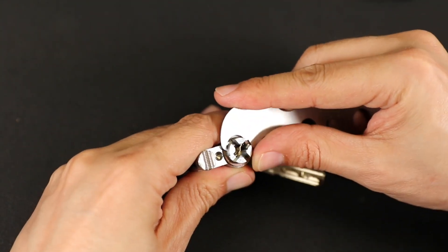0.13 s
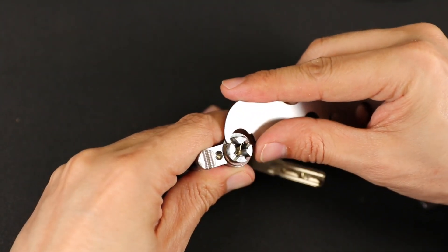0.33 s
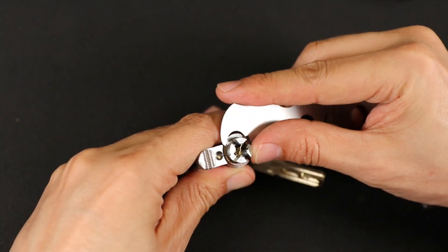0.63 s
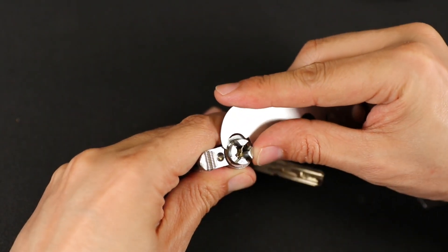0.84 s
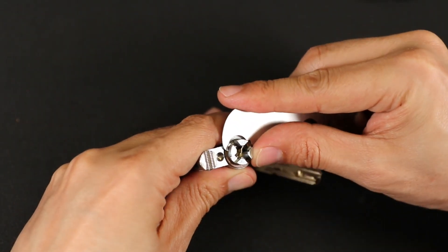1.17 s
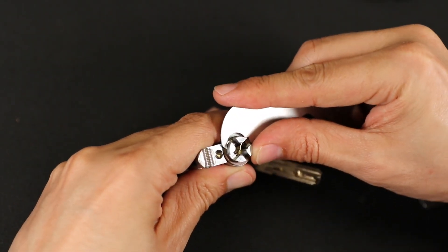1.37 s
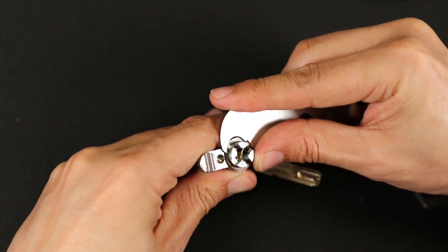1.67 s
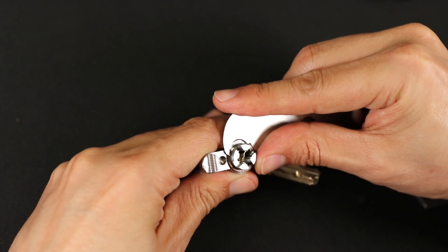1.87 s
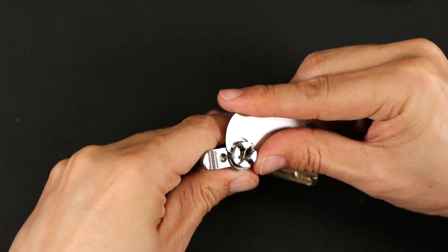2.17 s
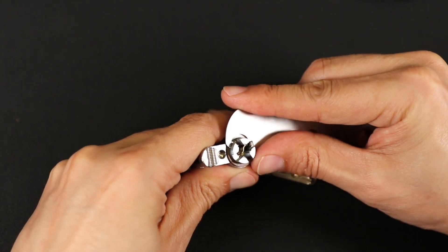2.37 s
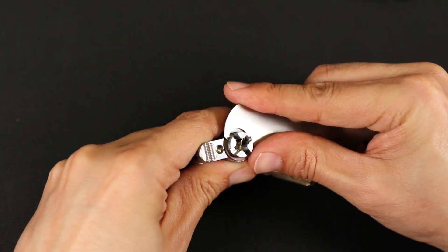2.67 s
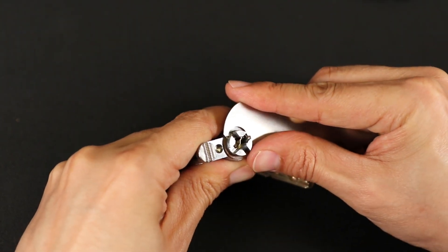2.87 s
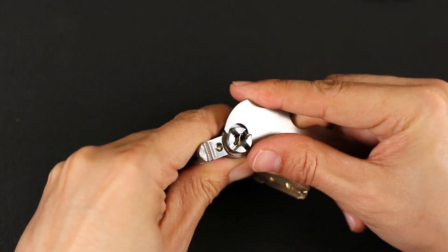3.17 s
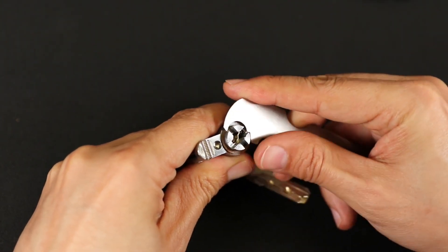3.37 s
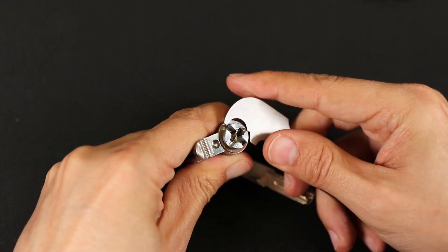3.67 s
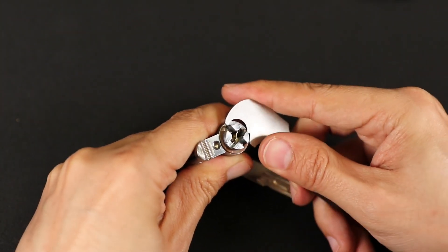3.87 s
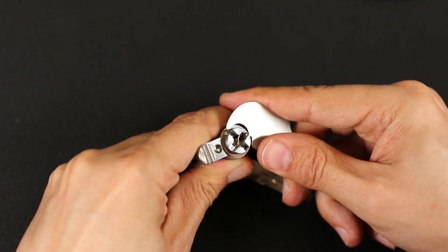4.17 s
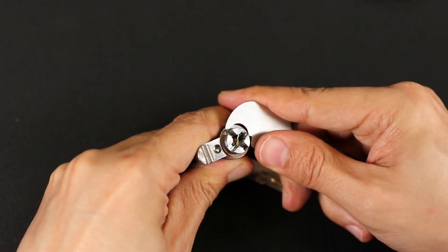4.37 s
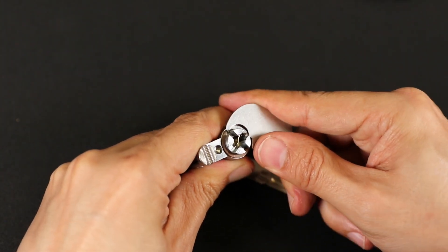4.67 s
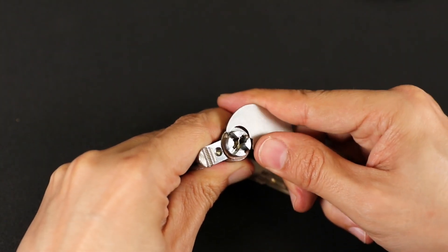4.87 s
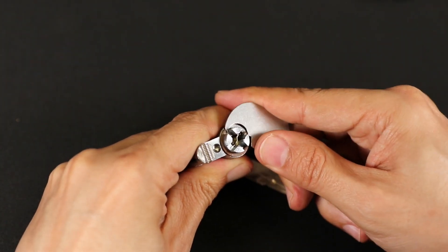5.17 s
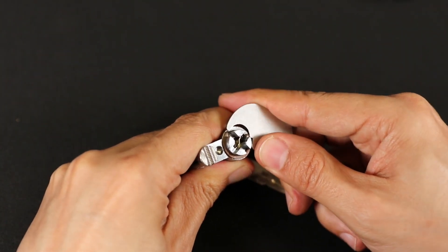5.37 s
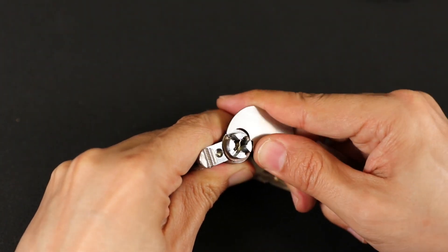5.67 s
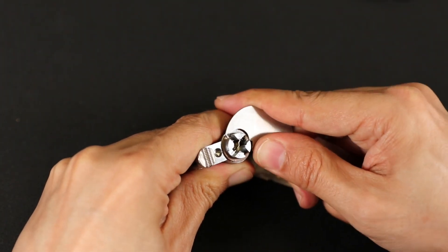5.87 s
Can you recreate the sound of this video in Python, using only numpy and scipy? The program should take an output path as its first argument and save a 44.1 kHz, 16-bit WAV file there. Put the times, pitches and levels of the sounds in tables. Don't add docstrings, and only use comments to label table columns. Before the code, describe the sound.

Close-up handling of a small brass lock: sharp ticks, hollow knocks, a brief key jingle and finger friction above quiet humming room noise.

```python
import sys
import numpy as np
from scipy import signal
from scipy.fft import rfft, irfft
from scipy.io import wavfile

SR = 44100
rng = np.random.default_rng(int(sys.argv[2]) if len(sys.argv) > 2 else 0)


def volts_from_db(level):
    exponent = np.asarray(level, float) / 20
    return 10 ** exponent


def unload_wav(signal):
    wavfile.write(
        sys.argv[1],
        SR,
        np.round(np.clip(np.atleast_2d(signal).T, -1, 1) * 32767).astype(np.int16),
    )


N = 265129
HISS_TOP_HZ = 15800


def unit(x):
    return x / np.sqrt(np.mean(x ** 2) + 1e-20)


def at_hz(points, hz):
    point_hz, point_db = np.array(points)[:, 0], np.array(points)[:, 1]
    return np.interp(np.log(hz), np.log(point_hz), point_db)


def resonance(x, hz, width_hz):
    r = np.exp(-np.pi * width_hz / SR)
    zeros = np.array([1, 0, -1]) * (1 - r * r) / 2
    poles = [1, -2 * r * np.cos(2 * np.pi * hz / SR), r * r]
    return signal.lfilter(zeros, poles, x)


def coloured(spectrum, top_hz=20000):
    hz = np.maximum(np.arange(N // 2 + 1) * SR / N, 5)
    white = rfft(rng.standard_normal(N))
    return unit(irfft(white * volts_from_db(at_hz(spectrum, hz)) * (hz < top_hz), N))


def struck(hz, gains, t60, t):
    sines = np.sin(2 * np.pi * np.outer(hz, t))
    return gains @ (sines * volts_from_db(-60 * np.outer(1 / t60, t)))


def add(track, s, sound):
    i = round(s * SR)
    track[i:i + len(sound)] += sound[:N - i]


def rumble():
    # (frequency [Hz], level [dB per Hz])
    room_spectrum = [(15, -13), (30, -22), (50, -8), (110, -3), (182, -5.5), (204, -13), (280, -9.5),
                     (340, -16.5), (424, -18.5), (728, -23), (972, -26), (1500, -31), (1950, -78)]
    return volts_from_db(-49) * coloured(room_spectrum)


def fan():
    # (frequency [Hz], width [Hz], rms level [dB])
    fan_modes = [(60, 3.1, -63), (95.6, 20.4, -56), (144.33, 4.8, -54), (178, 6.1, -60.5), (281, 34, -66),
                 (545, 5.6, -74), (1557, 54, -76.5)]
    hum_hz, hum_db = 177.6, -54
    out = volts_from_db(hum_db) * np.sqrt(2) * np.sin(2 * np.pi * hum_hz * np.arange(N) / SR)
    for hz, width_hz, level_db in fan_modes:
        air = rng.standard_normal(N + SR)
        ringing = resonance(resonance(air, hz, width_hz), hz, width_hz)
        out += volts_from_db(level_db) * unit(ringing[SR:])
    return out


def motor():
    run_starts = [-.31, .361, 1.151, 1.831, 2.501, 3.167, 3.844, 4.525, 5.195, 5.863, 6.5]
    gap_s, chirp_hz, chirp_db, chirp_s = 0.1185, 989, -60, 0.0073
    out, t = np.zeros(N), np.arange(N) / SR
    for start, following in zip(run_starts, run_starts[1:]):
        for s in np.arange(start, following - 0.06, gap_s):
            level, detune = rng.standard_normal(2)
            near = slice(max(0, round((s - 0.05) * SR)), max(0, round((s + 0.05) * SR)))
            bell = np.exp(-0.5 * ((t[near] - s) / chirp_s) ** 2)
            tone = np.sin(2 * np.pi * (chirp_hz + 12 * detune) * t[near])
            out[near] += volts_from_db(chirp_db + 2 * level) * bell * tone
    return out


def key():
    # (frequency [Hz], level [dB], t60 [s])
    key_modes = [(2816, -3, 0.033), (3780, -8, 0.037), (5460, -6.5, 0.029), (6770, -3, 0.03),
                 (7820, -4, 0.056), (9350, 2, 0.036), (10940, -4, .055), (12200, -6, .04),
                 (13000, -13, .055)]
    # (time [s], level [dB])
    jolts = [
        (3.4587, -46),
        (3.4851, -35.5),
        (3.6976, -30.5),
        (3.7637, -62),
        (5.2373, -57),
    ]
    out, t = np.zeros(N), np.arange(6000) / SR
    hz, mode_db, t60 = np.transpose(key_modes)
    for s, level_db in jolts:
        gains = volts_from_db(level_db + mode_db + 2 * rng.standard_normal(len(hz)))
        add(out, s, struck(hz, gains, t60, t))
    return out


def fingers():
    # (time [s], level [dB])
    strokes = [
        [(0.0, -68), (0.098, -68), (0.478, -82), (0.7, -80)],
        [(1.9, -66), (2.374, -70), (2.542, -61), (3.36, -63.5)],
        [(3.5, -62), (4.3, -69)],
        [(5.05, -81), (5.266, -73), (5.7, -79)],
    ]
    # (frequency [Hz], level [dB per Hz])
    skin_spectrum = [(900, 5), (2000, 2), (3500, -1.5), (5000, -6.5), (7500, -2.5), (10000, -7.5),
                     (14000, -16.5)]
    # (time [s], rms level [dB], length [s])
    brushes = [(0.195, -51, 0.0035), (0.216, -56, 0.0075), (0.633, -56, .003), (2.033, -59, .003),
               (2.6, -71, 0.0072), (2.705, -69, 0.0038), (2.766, -60, 0.0057), (2.953, -69, .016),
               (3.104, -61, .006), (3.126, -58.5, 0.0075), (3.396, -54.5, 0.014), (3.418, -60, 0.0046),
               (3.434, -51.5, .005), (5.792, -55.5, 0.011), (5.887, -58, 0.0082)]
    # (time [s], level [dB])
    squeak_curve = [
        (0.05, -70),
        (0.13, -58),
        (0.4, -65.5),
    ]
    t = np.arange(N) / SR
    silence_db = -120
    curve = []
    for stroke in strokes:
        curve += [(stroke[0][0], silence_db), *stroke, (stroke[-1][0], silence_db)]
    level = volts_from_db(np.interp(t, *np.transpose(curve)))
    for s, brush_db, length_s in brushes:
        level += volts_from_db(brush_db) * np.exp(-0.5 * ((t - s) / length_s) ** 2)
    slow = unit(signal.lfilter([1], [1, -0.99], rng.standard_normal(N)))
    grain = volts_from_db(2.0 * 2 * np.tanh(slow / 2))
    squeak = unit(resonance(rng.standard_normal(N), 1580, 240))
    squeak_db = np.interp(t, *np.transpose(squeak_curve), left=silence_db, right=silence_db)
    rubbing = coloured(skin_spectrum, HISS_TOP_HZ) * level
    return grain * (rubbing + squeak * volts_from_db(squeak_db))


def thuds():
    # (time [s], peak level [dB], t60 [s])
    blows = [
        (0.023, -34, 0.16),
        (1.066, -35, 0.059),
        (2.036, -33.5, 0.041),
        (3.027, -29.5, 0.024),
        (3.48, -39, 0.04),
        (3.697, -38.5, 0.016),
        (5.237, -36, 0.022),
    ]
    hand_hz, onset_s = 262, 0.00067
    out, t = np.zeros(N), np.arange(6000) / SR
    for s, peak_db, t60 in blows:
        push = volts_from_db(peak_db - 60 * t / t60) * np.sin(2 * np.pi * hand_hz * t)
        add(out, s, push * (1 - np.exp(-t / onset_s)))
    return out


def knocks():
    # (time [s], peak level [dB], start pitch [Hz], relative tick level [dB], length [s])
    hollows = [
        (0.0113, -36.5, 1530, 2, 0.0057),
        (0.017, -33, 1440, -8, 0.0068),
        (2.169, -45, 870, -3, 0.0071),
        (2.349, -35, 1320, 5, 0.0041),
        (2.366, -36, 1160, 6.5, 0.0068),
        (2.415, -37.5, 1190, 6, 0.0038),
        (2.4222, -35.5, 1180, 7, 0.0057),
    ]
    # (frequency [Hz], width [Hz], level [dB])
    tick_bands = [
        (2700, 1350, -6),
        (7900, 1800, -4.5),
    ]
    fall, rough = 0.2, 0.84
    out, t = np.zeros(N), np.arange(3000) / SR
    for s, peak_db, start_hz, tick_db, length_s in hollows:
        noise = rng.standard_normal((2, len(t)))
        pitch_hz = start_hz * (fall + (1 - fall) * np.exp(-t / (1.035 * length_s)))
        swell = np.sin(np.pi * np.clip(t / length_s, 0, 1)) ** 2
        body = np.sin(2 * np.pi * np.cumsum(pitch_hz) / SR) * swell
        hollow_noise = unit(resonance(resonance(noise[1], 480, 610), 480, 610))
        after = rough * hollow_noise * (1 - np.exp(-t / 0.0004)) * np.exp(-t / 0.0066)
        burst = noise[0] * (np.exp(-t / 0.00071) + volts_from_db(-21.0) * np.exp(-t / 0.013))
        tick = sum(volts_from_db(db) * resonance(burst, hz, width_hz) for hz, width_hz, db in tick_bands)
        add(out, s, volts_from_db(peak_db) * (body + after + volts_from_db(tick_db + 4.5) * tick))
    return out


def clicks():
    # (frequency [Hz], level [dB], t60 [s])
    brass_modes = [(1380, -13, 0.072), (1880, -27, 0.11), (3580, -9, 0.15), (4900, 17, 0.072),
                   (5700, -44, 0.16), (6000, 4, 0.074), (7100, 24, 0.032), (7400, 2, 0.053),
                   (7850, 38, 0.05), (7900, 4, 0.15), (8290, 19, 0.081), (8400, -29, 0.021),
                   (8480, 25, 0.13), (10900, -5, 0.058), (12900, -17, 0.053), (14800, -65, 0.06)]
    colour_hz = [1300, 3200, 7000, 12500]
    tail_levels = [-11.5, -14, -13.5, -21.5]
    # (low [Hz], middle [Hz], high [Hz])
    part_modes = [
        (1487, 3600, 6300),
        (1333, 2480, 13000),
        (2206, 4100, 17000),
        (1190, 3950, 7900),
        (1160, 2780, 10500),
        (1710, 2900, 2500),
    ]
    # ((thud, body, edge, air level re peak [dB]), ring level re peak [dB], t60 [s])
    part_sounds = [
        ((-20.5, -10.5, -12.5, -19.5), 5.1, 0.04),
        ((-8, -9, -17, -25), 4.4, 0.041),
        ((-28, -10, -13.5, -14.5), 1.2, 0.045),
        ((-15, -17.5, -13.5, -19), 4.6, .055),
        ((-22.5, -17.5, -17, -9), 6.9, 0.057),
        ((-9, -27, -10.5, -24), 6.9, 0.038),
    ]
    # (time [s], peak level [dB], weight [dB], sharpness [dB], grip pitch ratio [1])
    plate_hits = [(.194, -21, -7, 5, .99), (0.2368, -45, 16, 19, 1), (0.2795, -36.5, 9.5, 1, 1.08),
                  (0.3724, -45, 11, -23, 0.91), (0.4522, -30, 1, -20, 0.81), (0.498, -45, 13, -17, .87),
                  (0.6197, -41.5, 10.5, -34, 0.93), (.836, -26.5, -0.5, -3.5, 0.96),
                  (1.0646, -37, -1.5, -3, 1.03), (1.0686, -25, 3, 0, .97), (1.482, -37.5, -2, 4.5, 1.1),
                  (3.46, -26.5, 3.5, 9, 1.05), (3.7641, -32, 3, -17, 1.3)]
    # (time [s], level [dB], weight [dB], sharpness [dB], ratio [1])
    plug_hits = [
        (.0508, -26.5, -8, 2, 1.3),
        (2.162, -49, 6, -8, 0.52),
        (2.0418, -40, 5.5, 4, 0.9),
        (2.6055, -52.5, 11.5, -8, 0.9),
        (3.027, -30, 0, -4, 0.92),
        (3.2151, -51, 1, 20, 0.89),
    ]
    # (time [s], level [dB], weight [dB], sharpness [dB], ratio [1])
    cam_hits = [
        (0.0237, -14, 8, -1, 0.94),
        (2.0348, -31.5, 7, 0, 1.3),
        (3.6914, -40, -2.5, 8, 1.3),
        (5.0757, -20.5, 6.5, 2.5, 1.06),
    ]
    # (time [s], level [dB], weight [dB], sharpness [dB], ratio [1])
    pin_hits = [
        (0.0151, -22.5, -11, -14, 0.89),
        (.5217, -45, 3, -11, 1.3),
        (3.4391, -19.5, -8, -6, 0.95),
        (5.2362, -19, -0.5, 8, 1.19),
    ]
    # (time [s], level [dB], weight [dB], sharpness [dB], ratio [1])
    bow_hits = [
        (3.485, -21.5, -1.5, 0, .99),
        (3.6964, -21, -1.5, 1.5, 1.01),
    ]
    # (time [s], level [dB], weight [dB], sharpness [dB], ratio [1])
    spring_hits = [
        (2.701, -51, 7, 0, 1.03),
        (2.7687, -51, 0, 0, .99),
        (2.8375, -47.5, 4, 1.5, 0.85),
    ]
    brass_db, snap_db, crack_db = -12.0, 7, -1.5
    chatter_s, lag_s = 0.0048, 0.00066
    shorten, hold, tail_stretch = 0.56, 1.15, 3.47
    edge_follows = 0.29
    out, t = np.zeros(N), np.arange(6000) / SR
    hz, mode_db, mode_t60 = np.transpose(brass_modes)
    limits_hz = [560, 2000, 5000, 10000, 14000]
    bands = [signal.butter(2, pair, "band", fs=SR, output="sos") for pair in zip(limits_hz, limits_hz[1:])]
    part_hits = [plate_hits, plug_hits, cam_hits, pin_hits, bow_hits, spring_hits]
    for part_hz, (part_db, ring_db, t60), hits in zip(part_modes, part_sounds, part_hits):
        for s, peak_db, weight_db, sharp_db, ratio in hits:
            strength = rng.standard_normal(len(hz))
            noise = rng.standard_normal((2, len(t)))
            bounce = rng.standard_normal(400)
            colour_db = np.add(part_db, [weight_db, 0, edge_follows * sharp_db, sharp_db])
            colour = list(zip(colour_hz, colour_db))
            brass_gains = volts_from_db(peak_db + brass_db + 0.3 * mode_db + 3 * strength + at_hz(colour, hz))
            brass = struck(hz, brass_gains, np.minimum(mode_t60, t60) / 2, t)
            touches = bounce ** 3 * np.exp(-t[:400] / chatter_s)
            sound = signal.fftconvolve(brass, touches / np.linalg.norm(touches))[:len(t)]
            own_hz = ratio * np.array(part_hz)
            own_gains = volts_from_db(peak_db + ring_db - 5.0 + at_hz(colour, own_hz))
            sound += struck(own_hz, own_gains, t60 * np.array([0.8, 0.6, 0.6]), t)
            for k, (band, band_db, tail_db) in enumerate(zip(bands, colour_db, tail_levels)):
                crack_fade = volts_from_db(-60 * (t / (shorten * t60)) ** hold)
                fade = crack_fade + volts_from_db(tail_db - 60 * t / (tail_stretch * t60))
                crack = np.std(fade) * unit(signal.sosfilt(band, noise[k % 2] * fade))
                sound += volts_from_db(peak_db + band_db + snap_db) * signal.sosfilt(band, t == 0)
                sound += volts_from_db(peak_db + band_db + crack_db) * crack
            add(out, s + lag_s, sound)
    return out


def scene():
    room = fan() + motor() + rumble()
    lock = clicks() + knocks() + key()
    hands = thuds() + fingers()
    return (room + lock + hands)[None]


def top_cut(x):
    return signal.sosfilt(signal.butter(12, 16650, fs=SR, output="sos"), x)


def record(dry):
    # (frequency [Hz], level [dB per Hz])
    hiss_spectrum = [(710, -48), (1200, -11), (1250, -8), (1750, -1.5), (2120, -3.5), (2810, -4.5),
                     (3410, -5.5), (4910, -10), (7240, -8), (12400, -11), (15700, -15)]
    whine_hz, whine_db, hiss_db = 12021, -82, -62
    low_pass = signal.cheby2(10, 40, 16500, fs=SR, output="sos")
    near = signal.sosfilt(low_pass, dry)
    whine = volts_from_db(whine_db) * np.sqrt(2) * np.sin(2 * np.pi * whine_hz * np.arange(N) / SR)
    wired = near + whine + volts_from_db(hiss_db) * coloured(hiss_spectrum, HISS_TOP_HZ)
    return top_cut(wired)


dry = scene()
out = record(dry)
unload_wav(out)
```